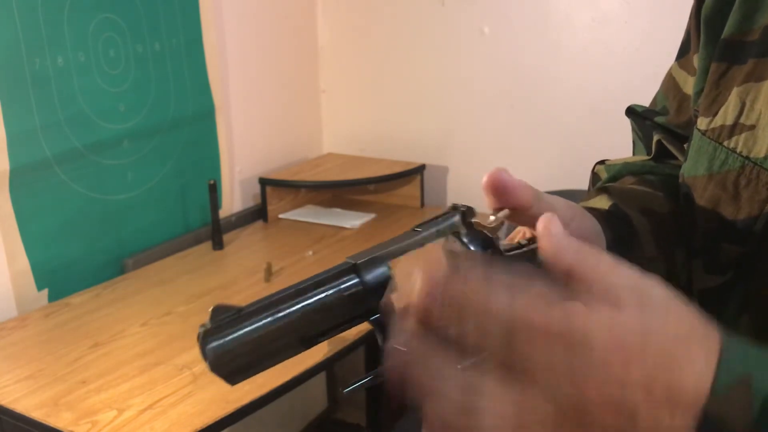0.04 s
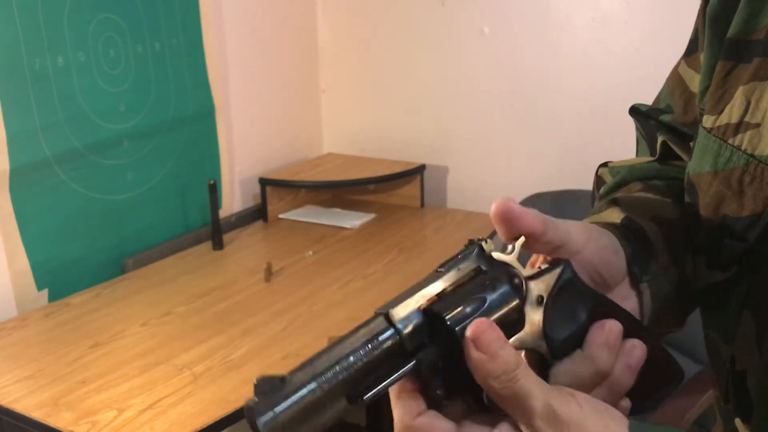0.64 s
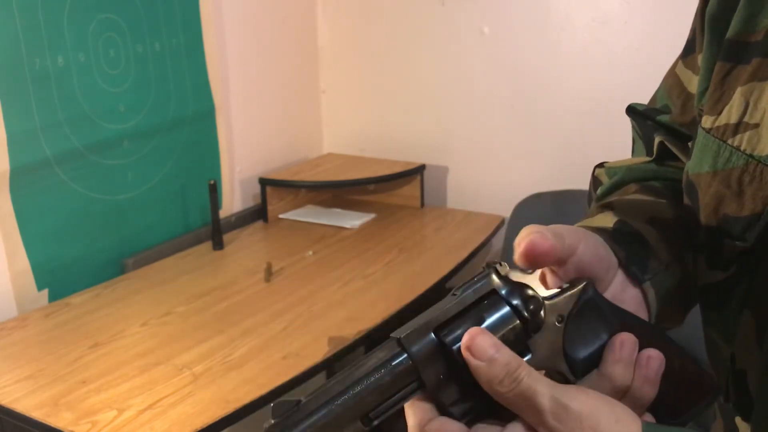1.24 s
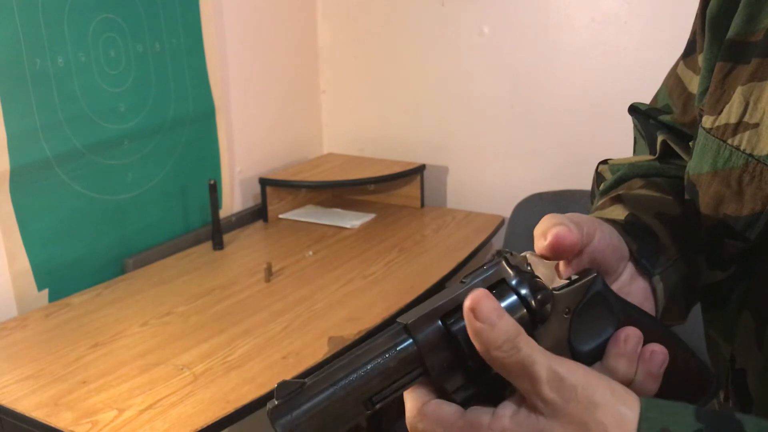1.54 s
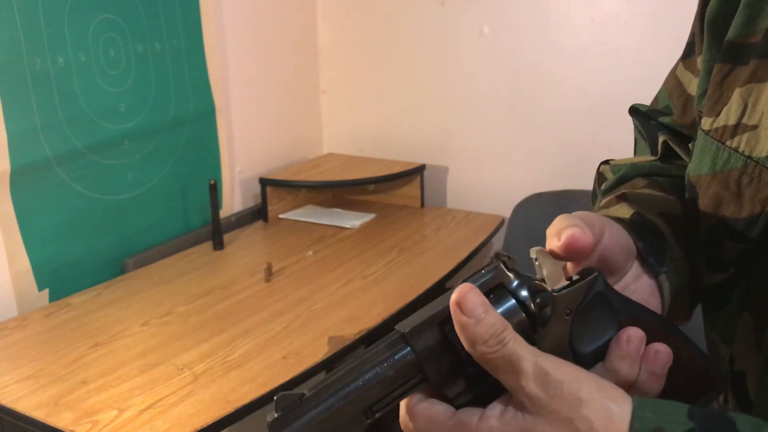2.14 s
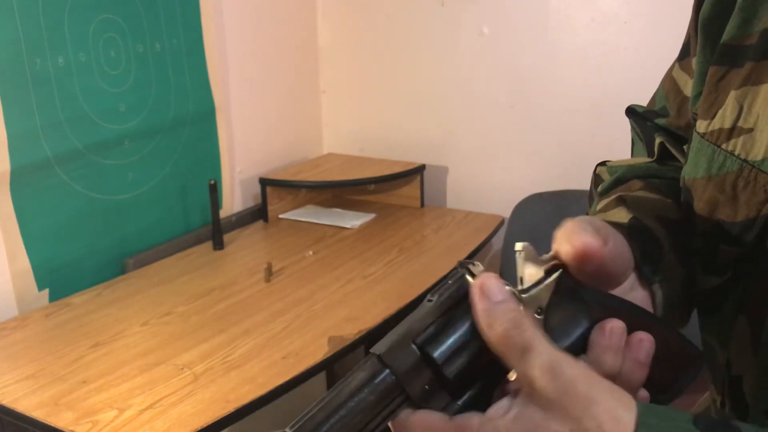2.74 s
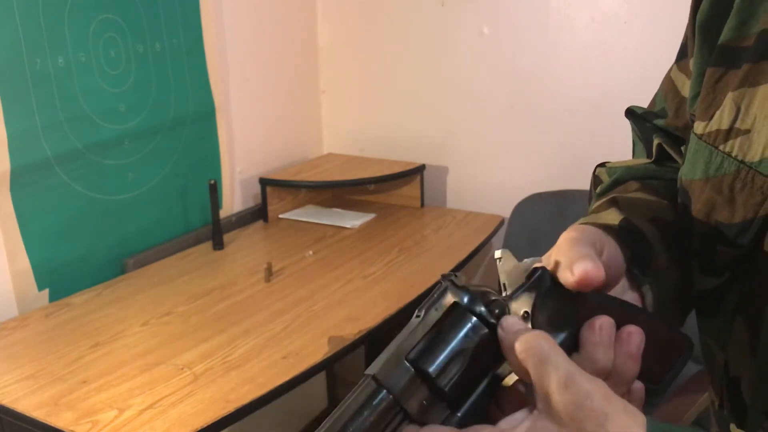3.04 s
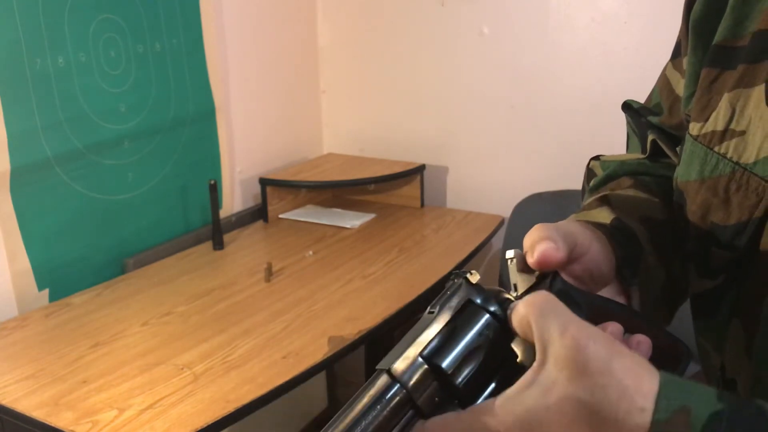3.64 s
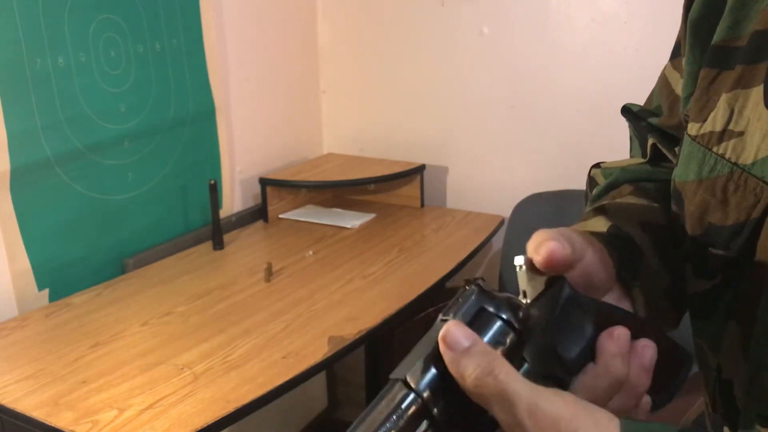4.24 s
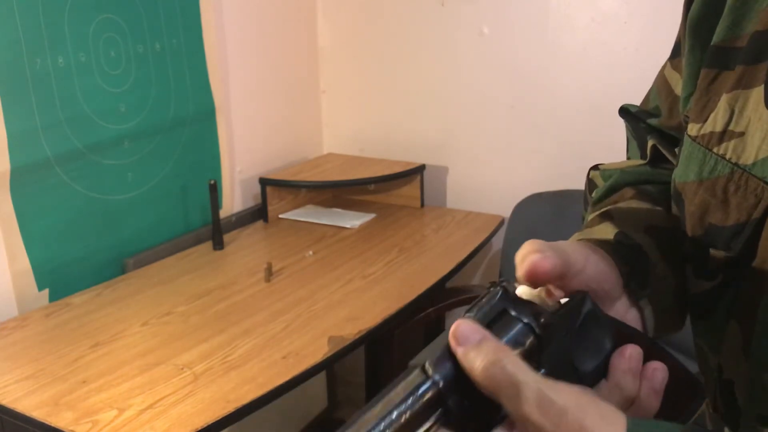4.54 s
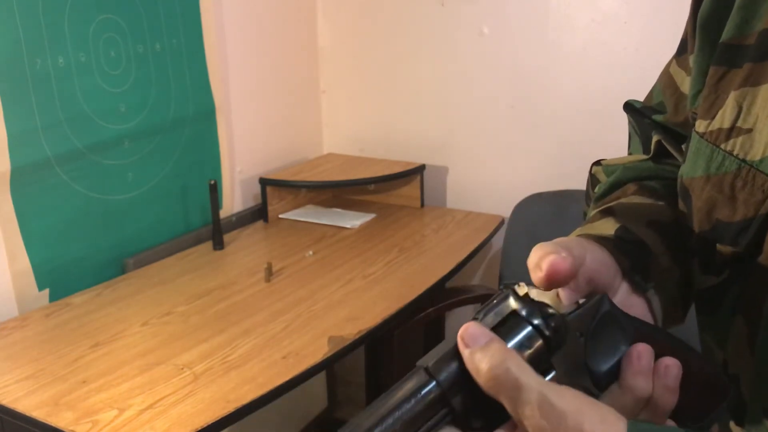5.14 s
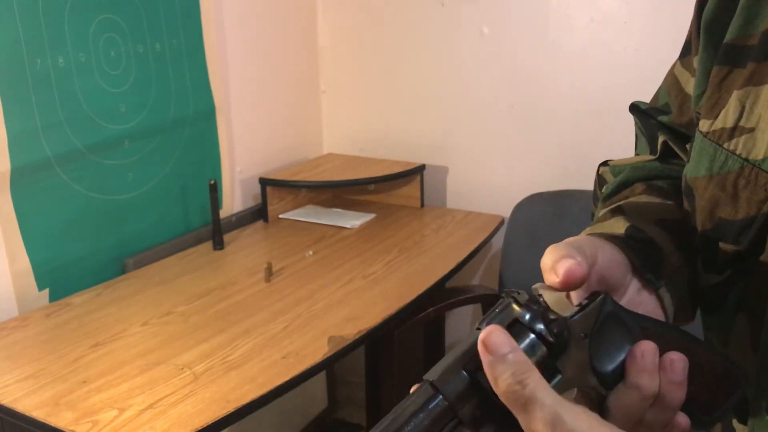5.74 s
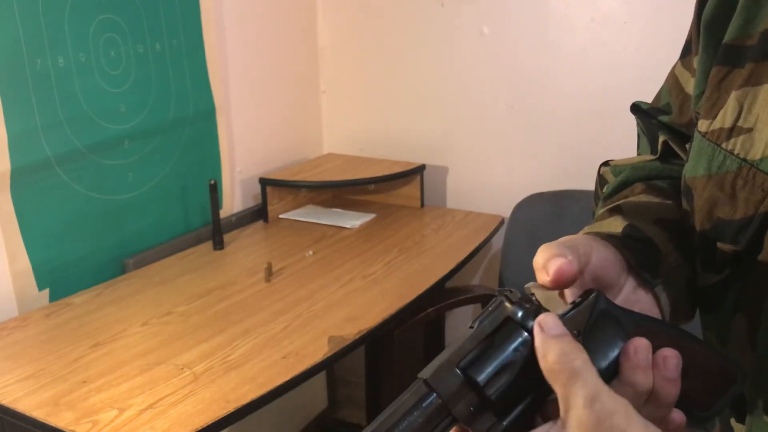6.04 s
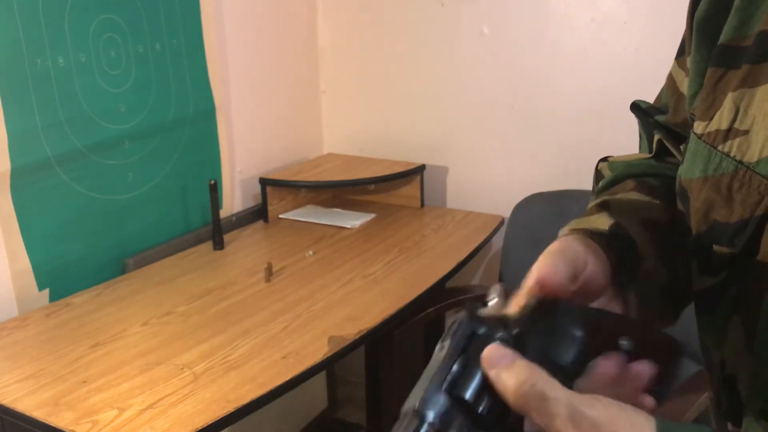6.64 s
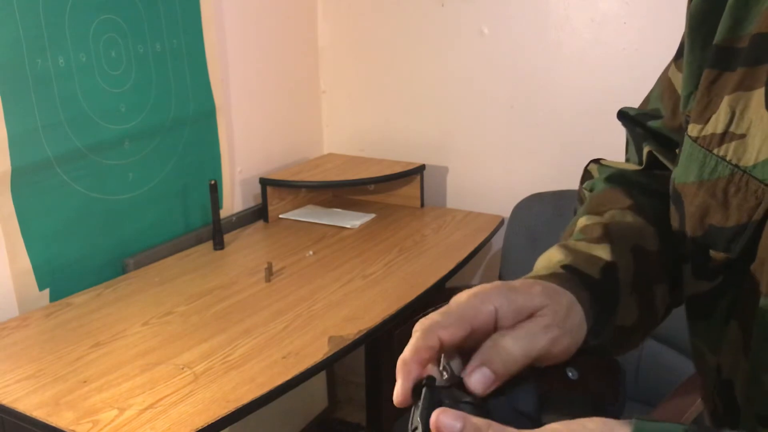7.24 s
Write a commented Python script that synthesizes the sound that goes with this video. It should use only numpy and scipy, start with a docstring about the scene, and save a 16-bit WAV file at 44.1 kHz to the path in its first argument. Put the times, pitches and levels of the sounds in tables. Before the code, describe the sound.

A revolver is worked by hand close to the microphone in a small, quiet room. A soft sleeve rustle opens. At about 0.5 seconds the cylinder clicks, then snaps shut at 0.7 with a loud, sharp steel click and a thin, very high, instant ring. A light tick follows at 1.8. At 2.4 the hammer is cocked with a loud, crisp double click. Very faint, thin grip squeaks come around 3 seconds. From 4.3 a few small clicks lead to a firmer one at 4.7 as the hammer is eased down. Tiny ticks follow near 5 seconds. At 6.3 the cylinder locks with a light click, and faint rustling and ticks continue until about 7.3. Every click is short and damped, with a brief room echo. A faint hum, low air rumble and slight hiss run throughout.

```python
"""Sharp metal clicks, close by, in a small, quiet room with a faint hum: a revolver is worked by hand.
The cylinder is swung shut, the hammer cocked and eased down, and the cylinder turned until it locks.
Each click is steel hitting steel. The hands stop the ringing within milliseconds, so it is the room
that carries the click on. Fingers and sleeves rustle in between."""
import sys
import numpy as np
from scipy import signal
from scipy.fft import rfft, irfft, next_fast_len
from scipy.io import wavfile
from scipy.ndimage import uniform_filter1d

SR = 44100
rng = np.random.default_rng(int(sys.argv[2]) if len(sys.argv) > 2 else 0)


def to_wav(s):
    """Save 16-bit WAV."""
    ch = np.atleast_2d(s).T  # columns
    pcm = np.round(np.clip(ch, -1, 1) * 32767)  # PCM
    wavfile.write(sys.argv[1], SR, pcm.astype(np.int16))


N = 330309

# where the five bands of a click start (knock, clack, snap, tick, ping): f/Hz
BANDS_HZ = [400, 2000, 5000, 9500, 14500]
TOP_HZ = 15950  # upper limit of the sound
PAD = 256  # samples of silence on each side of a click


def gun_clicks(crack_db):
    """The moving parts hit the frame, each at its own place, with its own loudness and brightness."""
    # hits of the latch, cylinder, hammer and trigger: t/s, level/dB, brightness/(dB per octave), place
    hits = [(0.5397, -33.5, 4.5, "cylinder"), (0.5446, -24.5, -3, "cylinder"),
            (0.6677, -38.5, 0, "cylinder"), (0.6716, -41, -1, "cylinder"), (0.6849, -36, 0.5, "cylinder"),
            (0.687, -21, -3, "cylinder"), (0.689, -13, 1, "cylinder"), (1.817, -35.5, 4.5, "stop"),
            (2.3872, -23, 2.5, "cocking"), (2.3916, -37, -2, "cocking"), (2.4045, -18.5, -1.03, "cocking"),
            (2.406, -13.7, 1, "cocking"), (4.3208, -30.5, 0, "lowering"), (4.5523, -36, 2.5, "lowering"),
            (4.6792, -35, 2.5, "lowering"), (4.682, -34, 4, "lowering"), (4.6845, -27.5, 2.5, "lowering"),
            (4.692, -16, -0.76, "lowering"), (6.346, -32.5, 1.9, "stop")]
    # names of the four ways the frame is struck
    places = ["cylinder", "cocking", "lowering", "stop"]
    shares_db = np.array([-18.5, -4, -6, -8, -9.5])  # each band's share at a brightness of zero
    centres_hz = np.sqrt(np.multiply(BANDS_HZ, BANDS_HZ[1:] + [TOP_HZ]))
    octaves = np.log2(centres_hz / 6972)  # brightness tips the bands around this pitch
    out = np.zeros(N)
    for start, level_db, bright_db, place in hits:
        hit = steel_hit(places.index(place), level_db, crack_db)
        band_db = level_db + shares_db + bright_db * octaves
        add(out, start - PAD / SR, shape_click(hit, band_db))
    add(out, 0.689, amp(-8) * latch_ring())  # the latch drops home
    return out


def steel_hit(place, level_db, crack_db, rise_s=0.00037, chatter_s=0.0014, crack_fade_s=0.005):
    """Steel meets steel: the surfaces chatter for a moment while the hand-held gun rings briefly."""
    # the gun's ringing tones: f/Hz, time to fade 60 dB/s, then level/dB for each place struck
    # (cylinder, cocking, lowering, stop)
    tones = [(810, 0.0098, -16, -22.5, -8.5, -22), (1050, 0.0089, -15.5, -10, -11.5, -17),
             (1758, .012, -6.5, -19.5, 3, 2), (2200, .01, -18, -20, -25.5, -1),
             (2990, 0.012, -2, -1.5, 0.5, -15), (3400, 0.01, -3, -14, -2, -1),
             (3760, 0.011, -7.5, 2.5, 1.5, -9.5), (4390, 0.0069, -6.5, 3.5, 3, -6.5),
             (5350, .008, -9, -8.5, -1, -9.5), (5890, 0.013, -7, -5.5, -8, -3),
             (6560, 0.015, -6, -2.5, -8, -5.5), (7280, 0.0087, -1, -4.5, -17, 2),
             (8525, .01, -5.5, -5.5, 2, -3), (8670, 0.0051, -10, -3.5, -8.5, 0.5),
             (9680, .008, -9.5, 1, -6.5, 3.5), (10970, 0.0074, -6.5, 0.5, -12, 5),
             (11700, .01, -2.5, -2.5, -1.5, -2), (12920, 0.0054, -1.5, -7.5, -14, 3),
             (14100, 0.0072, -3, -10, 0, 7), (15400, 0.01, -3, -8.5, -6, -16)]
    t = np.arange(2048) / SR
    hz, fade_s, *place_db = np.transpose(tones)[:, :, None]
    phase = rng.random((len(tones), 1))
    ring = (amp(place_db[place] - 60 * t / fade_s) * np.sin(2 * np.pi * (hz * t + phase))).sum(0)
    crack = rng.standard_normal(len(t)) * amp(-60 * np.maximum(t - chatter_s, 0) / crack_fade_s)
    ring_db = -0.12 * max(-21 - level_db, 0)  # a light hit rings less
    attack = np.minimum(t / rise_s, 1)
    return (amp(ring_db) * unit_level(ring) + amp(crack_db) * unit_level(crack)) * attack


def shape_click(hit, band_db, bass_hz=680):
    """Sets a click's strength in each band and cuts the bass, which so small an object cannot give off."""
    padded = np.pad(hit, PAD)
    spectrum, hz = rfft(padded), np.fft.rfftfreq(len(padded), 1 / SR)
    band = np.maximum(np.digitize(hz, BANDS_HZ) - 1, 0)
    energy = np.bincount(band, abs(spectrum) ** 2) / len(spectrum)
    power = energy / (0.003 * SR)  # as if it all came within 3 ms
    gain_db = uniform_filter1d((band_db - 10 * np.log10(power))[band], size=31)
    bass_cut = 1 / (1 + (bass_hz / (hz + 1)) ** 6)
    return irfft(spectrum * amp(gain_db) * bass_cut)


def latch_ring(rise_s=0.0006):
    """The closing latch gives a thin, very high ring of its own."""
    # the latch's ringing tones: f/Hz, time to fade 60 dB/s, level/dB
    tones = [(14300, 0.013, -7), (15100, 0.019, 0), (15660, .012, -12)]
    t = np.arange(2048) / SR
    phase = rng.random()
    ring = sum(amp(db - 60 * t / fade_s) * np.sin(2 * np.pi * (hz * t + phase))
               for hz, fade_s, db in tones)
    return ring * np.minimum(t / rise_s, 1)


def loose_parts():
    """Loose parts tick faintly as the grip shifts."""
    # light touches of steel: t/s, level/dB, brightness/(dB per octave)
    touches = [(1.1351, -57.5, -7), (1.7986, -58.5, 7), (4.317, -48, -6), (4.5106, -57, -6),
               (4.6476, -52.5, -1), (4.6626, -51, -2), (4.6758, -50, 4), (5.0134, -54, -3),
               (5.0418, -55, -1.5), (6.596, -54.5, -0.5), (6.6304, -51, 0), (7.3239, -57.5, 0.5),
               (7.3322, -55, -2)]
    shares_db = np.array([-9, -3, -6, -10, -18])  # each band's share of a tick
    octaves = np.log2(np.maximum(BANDS_HZ, 1000) / BANDS_HZ[1])
    out = np.zeros(N)
    for start, level_db, bright_db in touches:
        hit = steel_hit(0, level_db, crack_db=0)  # struck at the cylinder
        band_db = level_db + shares_db + bright_db * octaves
        add(out, start - PAD / SR, shape_click(hit, band_db))
    return out


def near_echoes(sound):
    """The desk and the near wall throw each click back within a few milliseconds."""
    # single bounces: delay/s, level/dB
    bounces = [(.0056, -17.5), (.0068, -22.5), (.0094, -23.5), (.0112, -19), (.0128, -22), (.0142, -24)]
    echo = np.zeros(SR // 10)
    for delay, db in bounces:
        add(echo, delay, amp([db]))
    return signal.oaconvolve(sound, echo)[:N]


def room_echo(sound, tail_db=-10.5, scatter_db=-17, scatter_fade_s=0.049, delay_s=0.0034):
    """Sound scatters off the furniture, then blurs into a tail whose highest treble dies first."""
    # tone colour of the tail: f/Hz, level/dB
    colour = [(200, -2), (500, 4), (1000, 7.5), (2000, -1), (3000, -5.5), (4500, -4.5), (6500, -2),
              (9000, -2), (10500, -1.5), (12500, -0.5), (14000, 0.5), (15500, -4.5)]
    # how long the tail lasts: f/Hz, time to fade 60 dB/s
    fade_times = [(300, .45), (1000, 0.41), (3000, 0.57), (7000, 0.56), (11000, .39), (16000, 0.18)]
    t = np.arange(SR) / SR
    hz, frame_s, frames = signal.stft(rng.standard_normal(SR), SR, nperseg=256)
    frames *= amp(curve_at(colour, hz)[:, None] - 60 * frame_s / curve_at(fade_times, hz)[:, None])
    fade_in = np.clip(t / delay_s - 1, 0, 1)
    tail = signal.istft(frames, SR, nperseg=256)[1][:SR] * fade_in
    scatter = rng.standard_normal(SR) * amp(-60 * t / scatter_fade_s) * (t > delay_s)
    echo = amp(tail_db) * tail / np.linalg.norm(tail) + amp(scatter_db) * scatter / np.linalg.norm(scatter)
    return signal.fftconvolve(sound, echo)[:N]


def rustle(grain_db=1.5):
    """Sleeves and skin rub in soft swells of noise, grainy where the cloth catches."""
    # hand movements: middle t/s, length/s, level/dB
    moves = [(0.11, 0.25, -60.5), (0.31, 0.25, -71), (3.473, .5, -75.5), (3.931, 0.24, -68.5),
             (4.512, 0.13, -69), (5.95, 0.13, -71), (6.686, 0.4, -66.5), (6.981, 0.31, -66.5)]
    # tone colour of sliding cloth: f/Hz, level/dB
    cloth = [(300, -1), (1500, -1), (3000, 3.5), (5000, -3.5), (8000, -6.5), (10500, -10.5), (13000, -6),
             (16000, -15)]
    swells = np.zeros(N)
    for middle, length, level_db in moves:
        add(swells, middle - length / 2, amp(level_db) * arch(length))
    catches = wobble(120)
    return swells * noise(cloth) * amp(grain_db * catches)


def grip_squeaks(pitch_wobble=0.0061):
    """Faint, thin squeaks swell and fade as the grip changes, a little unsteady in pitch."""
    # squeaks: middle t/s, length/s, level/dB, f/Hz
    squeaks = [(2.955, 0.29, -74, 4600), (3.27, 0.34, -77, 3460)]
    out = np.zeros(N)
    for middle, length, level_db, hz in squeaks:
        swell = arch(length) ** 2
        pitch_hz = hz * (1 + pitch_wobble * wobble(200)[:len(swell)])
        tone = np.sin(2 * np.pi * np.cumsum(pitch_hz) / SR)
        add(out, middle - length / 2, amp(level_db) * swell * tone)
    return out


def background(waver=0.85, hum_db=-1):
    """The room's air rumbles softly, the microphone hisses, and a faint hum wavers."""
    # tone colour of the room's air: f/Hz, level/dB
    rumble = [(19, -33), (32, -1.5), (49, 2), (76, -8), (107, -1.5), (135, -10.5), (173, -6), (247, -5.5),
              (330, -10), (360, -11), (387, -16), (631, -16), (698, -19), (750, -16.5), (1000, -22.5),
              (1300, -51), (2200, -120)]
    # tone colour of the microphone's hiss: f/Hz, level/dB
    hiss = [(590, -30.5), (1000, -4), (1150, -5.5), (1290, -3.5), (1330, -4), (1530, -2.5), (1880, -9.5),
            (3000, -13.5), (3600, -15.5), (6600, -19.5), (7320, -23.5), (9200, -19), (10600, -27),
            (11600, -21.5), (15400, -24)]
    # tones of the hum: f/Hz, relative level/dB
    hum_tones = [(102.3, -69), (360.7, -75), (613.7, -79.5), (656.8, -77), (775.2, -83.5), (1244, -82.5),
                 (1507, -81.5)]
    t = np.arange(N) / SR
    steps_s = np.arange(0, t[-1] + 1, 0.1)
    hum = np.zeros(N)
    for hz, db in hum_tones:
        drift = np.interp(t, steps_s, np.cumsum(rng.standard_normal(len(steps_s))))
        hum += amp(db + hum_db) * np.sqrt(2) * np.sin(2 * np.pi * hz * t + waver * drift)
    return hum + amp(-59.5) * noise(rumble) + amp(-68) * noise(hiss)


def amp(db):
    """Turns decibels into a number to multiply by."""
    return 10 ** (np.asarray(db) / 20)


def unit_level(x):
    """Scales a signal to an average strength (rms) of one."""
    return x / np.sqrt(np.mean(x ** 2) + 1e-20)


def curve_at(points, hz):
    """Reads between (f/Hz, value) points, with octaves evenly spaced."""
    f, value = np.transpose(points)
    return np.interp(np.log(hz + 1), np.log(f + 1), value)


def add(mix, start_s, sound):
    """Lays a sound into the mix at the given time."""
    part = mix[max(round(start_s * SR), 0):][:len(sound)]
    part += sound[:len(part)]


def arch(length_s):
    """A smooth rise from zero to one and back."""
    return np.sin(np.linspace(0, np.pi, int(length_s * SR)))


def wobble(samples):
    """Random ups and downs, smoothed over this many samples."""
    return unit_level(uniform_filter1d(rng.standard_normal(N), size=samples))


def noise(colour):
    """Steady noise with the given tone colour."""
    size = next_fast_len(N)
    gain = amp(curve_at(colour, np.fft.rfftfreq(size, 1 / SR)))
    return unit_level(irfft(rfft(rng.standard_normal(size)) * gain, size)[:N])


def scene(directions=6):
    """The gun sounds different in each direction: one reaches the microphone, the room blends the rest."""
    ticks = loose_parts()
    direct = gun_clicks(crack_db=-5) + ticks
    sideways = [gun_clicks(crack_db=0) + ticks for _ in range(directions)]
    echo = near_echoes(sideways[0]) + sum(room_echo(x) for x in sideways) / np.sqrt(directions)
    return (direct + echo + rustle() + grip_squeaks() + background())[None]


def record(dry):
    """Cuts off the very highest treble."""
    treble_cut = signal.firwin(255, TOP_HZ, window=("kaiser", 8), fs=SR)
    return signal.oaconvolve(dry, treble_cut[None], "same")


dry = scene()
out = record(dry)
to_wav(out)
```